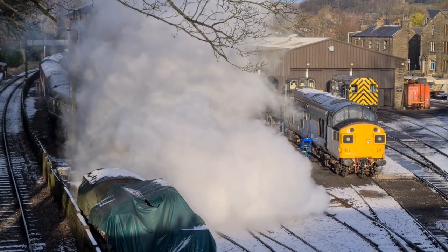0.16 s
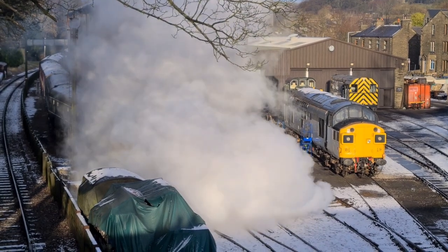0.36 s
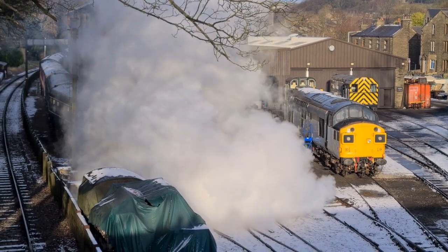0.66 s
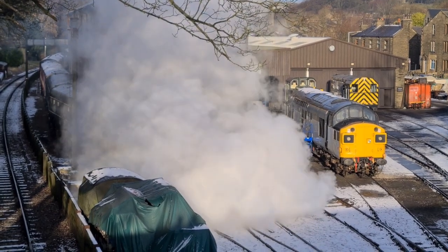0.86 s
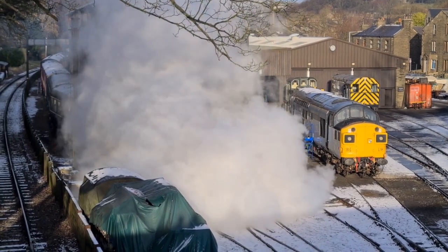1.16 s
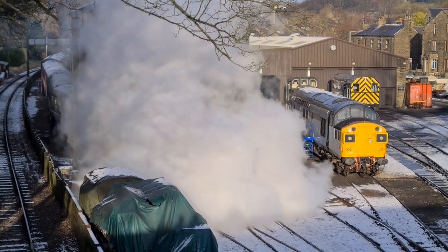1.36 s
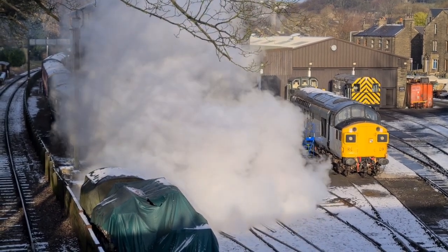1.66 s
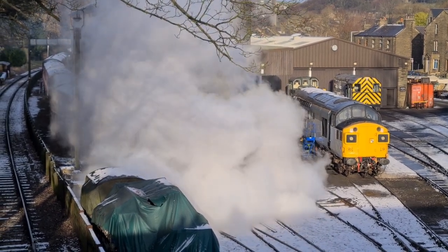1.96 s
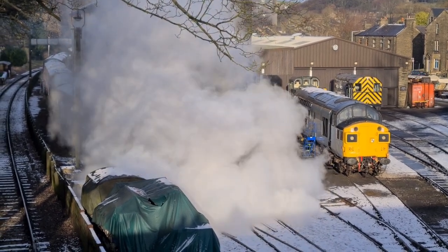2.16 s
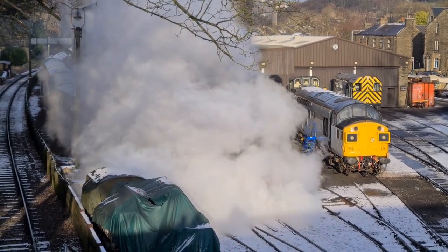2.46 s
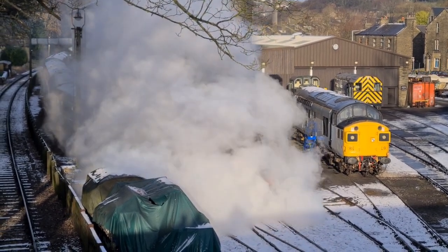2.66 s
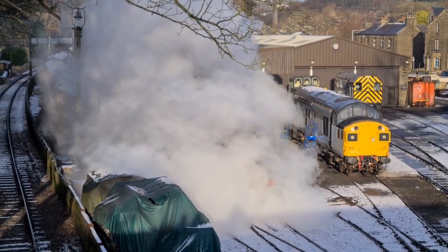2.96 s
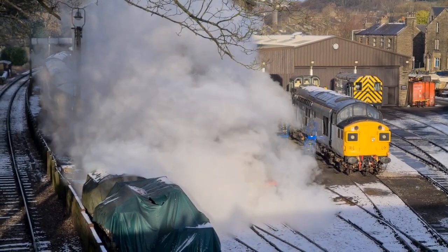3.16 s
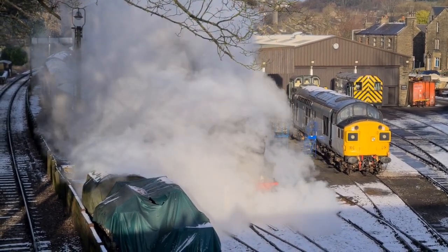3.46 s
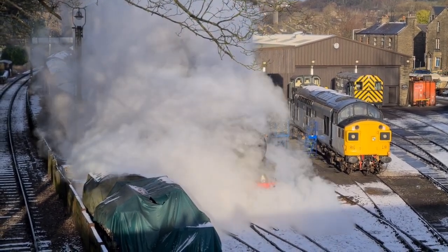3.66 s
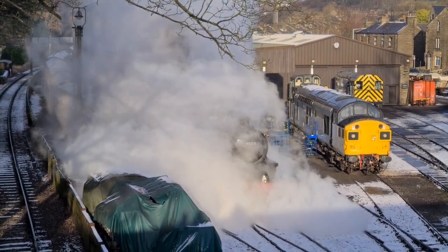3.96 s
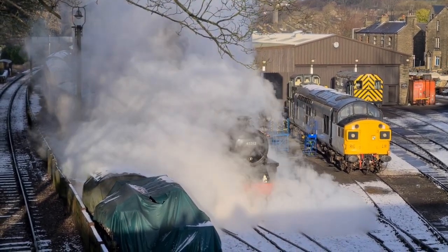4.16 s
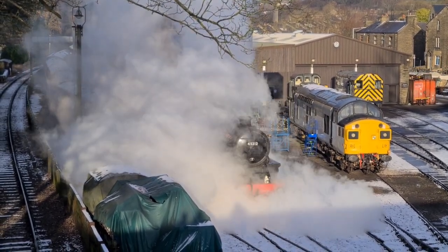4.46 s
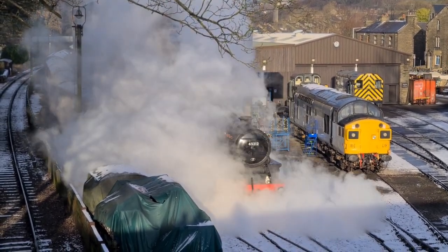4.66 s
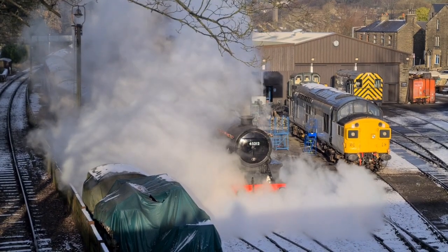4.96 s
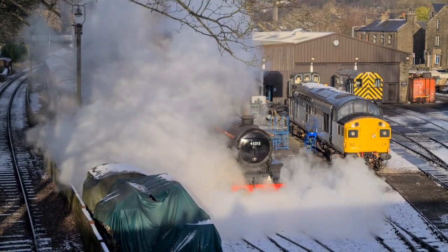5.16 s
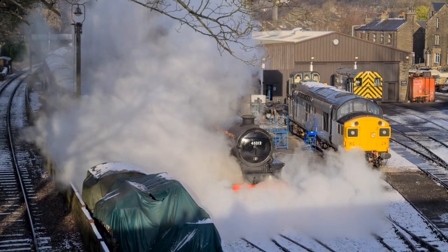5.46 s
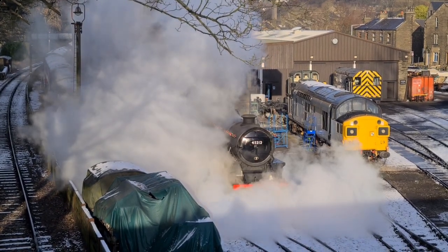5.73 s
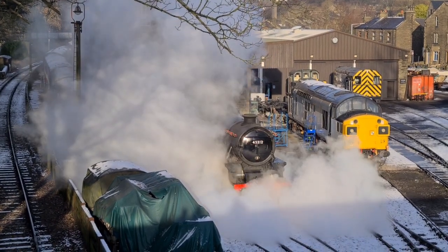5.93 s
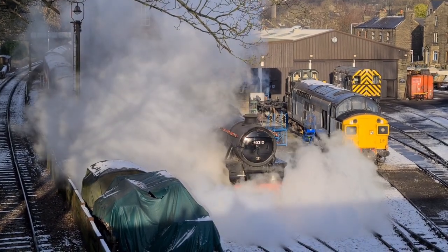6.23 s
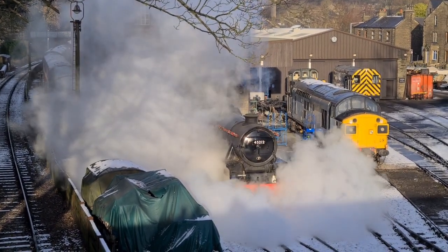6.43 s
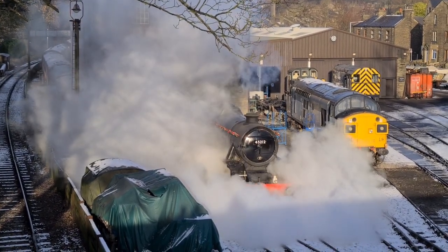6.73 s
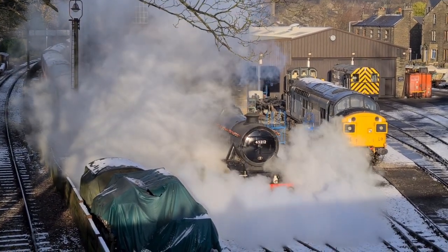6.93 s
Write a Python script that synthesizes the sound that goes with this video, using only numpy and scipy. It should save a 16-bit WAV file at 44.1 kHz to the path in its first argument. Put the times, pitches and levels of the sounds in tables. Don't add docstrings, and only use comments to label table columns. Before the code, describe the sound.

Dense roaring steam jets gush unevenly from a slow locomotive, dipping early then swelling strongly, over idling engines and gusts on the microphone.

```python
import sys
import numpy as np
from scipy import signal
from scipy.fft import rfft, irfft, next_fast_len
from scipy.io import wavfile

SR = 44100
rng = np.random.default_rng(int(sys.argv[2]) if len(sys.argv) > 2 else 0)


def nominal_scale(level):
    x = np.asarray(level, float) / 20
    return 10 ** x


def output_pcm(signal):
    pcm = np.clip(np.atleast_2d(signal).T, -1, 1) * 32767
    wavfile.write(sys.argv[1], SR, np.round(pcm).astype(np.int16))


N = 312669
SIZE = next_fast_len(N)
HZ = np.maximum(np.arange(SIZE // 2 + 1) * SR / SIZE, 1)
STEP = 100


def rms_one(x):
    return x / np.sqrt(np.mean(x ** 2) + 1e-20)


def centred(db):
    return db - np.mean(db)


def in_time(rows):
    s, *columns = np.transpose(rows)
    return [np.interp(np.arange(N) / SR, s, column) for column in columns]


def at_hz(points, hz):
    points = np.array(points, float)
    return np.interp(np.log(hz), np.log(np.maximum(points[:, 0], 1)), points[:, 1])


def swell(s, length_s, order):
    t = np.arange(0, N + STEP, STEP) / SR
    return np.exp(-np.abs(2 * (t - s) / length_s) ** order)


def fill(coarse):
    return np.interp(np.arange(N) / STEP, np.arange(len(coarse)), coarse)


def drift(rate_hz):
    hop, run_in = 40, 2000
    r = np.exp(-2 * np.pi * rate_hz * hop / SR)
    noise = rng.standard_normal(N // hop + run_in + 2)
    slow = signal.lfilter([1], [1, -2 * r, r * r], noise)[run_in:]
    return np.interp(np.arange(N) / hop, np.arange(len(slow)), rms_one(slow))


def bumps(modes):
    return nominal_scale(sum(db / (1 + (2 * (HZ - hz) / width) ** 2) for hz, width, db in modes))


def bands(straight, scattered, edges):
    for low, hz, high in zip(edges, edges[1:], edges[2:]):
        bell = np.interp(np.log(HZ), np.log([low, hz, high]), [0, 1, 0])
        yield hz, irfft(straight * bell, SIZE)[:, :N], irfft(scattered * bell, SIZE)[:, :N]


def echoes(x, level_db, count):
    t = np.arange(SIZE)
    lags = rng.uniform([.0008, -.0004], [.016, .0004], (count, 2))
    late = 0
    for lag, slide in lags:
        delay = np.abs(lag * SR + slide * t)
        late = late + x[np.rint(t - delay).astype(int)]
    return x + nominal_scale(level_db) * late


def field(colour, ports, echo_db):
    # pitch_hz, level_db
    tilt_points = [(60, -1.5), (130, -0.5), (290, -0.5), (640, -1), (1410, -2.5), (3100, 0), (6820, -4),
                   (15000, -2.5)]
    # pitch_hz, lead_radians
    lead_points = [(0, 0), (2650, -.3), (3050, -3.3), (3700, -4.6), (4150, -6.3), (4550, -6.6),
                   (4900, -7.8), (5050, -10.4), (5300, -12.6), (5750, -13.6), (6050, -16.6), (6500, -18.8),
                   (7300, -19.5), (16000, -44)]
    one, left, right = rng.standard_normal((3, SIZE))
    one = rms_one(echoes(one, echo_db, count=5))
    one, left, right = rfft([one, left, right]) * colour
    side = np.array([[1], [-1]])
    tilt = nominal_scale(side * at_hz(tilt_points, HZ) / 2)
    lead = np.exp(.5j * side * np.interp(HZ, *np.transpose(lead_points)))
    straight = one * ports * lead * tilt
    scattered = np.array([left, right]) * ports ** 0.52 * tilt
    return straight, scattered


def blend(hz, straight, scattered, share):
    # pitch_hz, likeness_0_to_1
    likeness = [(30, .42), (90, .55), (250, .91), (520, .88), (1200, .85), (2400, .99), (3150, .72),
                (4000, .88), (6500, .8), (8500, .58), (16000, .47)]
    alike = np.clip(at_hz(likeness, hz) * share, 0, 1)
    return np.sqrt(alike) * straight + np.sqrt(1 - alike) * scattered


def yard():
    # pitch_hz, level_db (per Hz)
    rumble = [(12, -39), (27, -9), (42, -1.5), (70, 1.5), (124, -4), (194, -1.5), (262, -2.5), (330, -5),
              (433, -10), (520, -11.5), (700, -12), (900, -23), (1400, -50)]
    # pitch_hz, width_hz, level_db
    idle = [
        (60, 14, 3),
        (84, 12, 3),
        (200, 18, 3),
        (230, 18, 3),
        (275, 25, 2),
    ]
    # time_s, level_db
    load = [
        (0.0, 0.5),
        (0.89, 3.5),
        (1.19, -2.3),
        (2.12, -5.0),
        (3.48, 6),
        (4.12, 3.5),
        (4.32, -4),
        (5.46, -2.5),
        (5.89, 1),
        (7.09, 3),
    ]
    # centre_s, length_s, level_db
    gusts = [
        (1.4, 0.17, 6),
        (1.906, 0.15, 3.5),
        (2.406, 0.46, 6),
        (2.722, 0.15, 5.5),
        (3.02, 0.072, 5.7),
        (3.768, 0.34, 7.5),
        (4.143, 0.22, 0.5),
        (5.596, 0.18, 9.9),
        (6.24, 0.14, 6.9),
        (6.672, 0.2, 8),
    ]
    throb_hz, drone_hz = 91, 202
    load_db, = in_time(load)
    gust_db = fill(sum(db * swell(s, length, order=2) for s, length, db in gusts))
    fade_db = 1.76 * np.arange(N) / SR
    throb_db = centred(0.66 * load_db + gust_db - fade_db)
    drone_db = centred(load_db + 0.24 * gust_db)
    straight, scattered = field(nominal_scale(at_hz(rumble, HZ)) * bumps(idle), 1.0, -14.0)
    out = 0
    for hz, near, far in bands(straight, scattered, np.geomspace(14, 1500, num=11)):
        high = at_hz([(throb_hz, 0), (drone_hz, 1)], hz)
        drone_share = at_hz([(350, 0.91), (650, 0.52)], hz)
        level_db = (1 - high) * throb_db + high * drone_db * drone_share
        lump_db = .7 * drift(4.7)
        out = out + nominal_scale(level_db + lump_db) * blend(hz, near, far, 0.93)
    return rms_one(out) * nominal_scale(-28.0)


def buffets():
    # time_s, peak_db, pitch_hz
    thumps = [
        (2.393, -18, 70),
        (3.76, -21, 80),
        (5.6, -23, 70),
        (3.02, -23, 75),
    ]
    t = np.arange(N) / SR
    out = 0
    for s, db, hz in thumps:
        hump = np.exp(-((t - s) * hz * 1.8) ** 2)
        out = out - nominal_scale(db) * hump * np.cos(2 * np.pi * hz * (t - s))
    return out


def jets():
    # pitch_hz, level_db (per Hz)
    jet = [(400, -66), (680, -15.5), (800, -6.5), (1120, -3), (1600, -2), (2200, -1), (2730, -4.5),
           (3100, -8), (4140, -8.5), (5900, -8), (7300, -15), (8000, -15.5), (9300, -22), (15800, -22.5)]
    # pitch_hz, width_hz, level_db
    left_port = [(2950, 300, -7), (4000, 700, 3), (4440, 160, -11), (4730, 180, 3), (5030, 200, -9),
                 (5450, 250, 3), (5750, 150, -4), (6300, 150, -3), (8400, 800, 3), (9300, 500, -3),
                 (14000, 1500, -3)]
    right_port = [(2000, 500, 3), (2950, 300, -3), (3580, 250, 5), (3880, 200, -5), (4440, 160, -7),
                  (4770, 200, 3), (5200, 220, -7), (6030, 450, 5), (6380, 160, -10), (6650, 250, 2),
                  (7250, 450, 5), (8400, 900, -5), (11900, 1200, 3), (14300, 1200, -4)]
    # time_s, straight_share_0_to_1, left_over_right_db
    path = [(0, 0.4, -1.5), (.4, 0.7, 0), (.65, 0.85, -0.5), (1.2, 0.84, -1.5), (1.65, 0.6, -0.5),
            (2.4, 0.5, -1), (2.7, 0.82, -1), (3.2, 0.58, -1), (4.3, 0.83, -1.5), (4.65, 0.86, 0),
            (5.2, 0.87, -2), (6.0, .76, 0), (6.6, 0.69, -2), (7.09, 0.57, 0)]
    # pitch_hz, gain_db
    clear_path = [(2500, 0.5), (4200, -0.5), (6800, -2), (9300, -2), (11500, -1), (14000, -2)]
    # time_s, flow_db, facing_db (how squarely the jets face the ports)
    flow = [(0.0, -6.0, 9), (0.28, -9.5, 7), (0.61, -3, 7.5), (1.0, -3.5, 7), (2.01, -9.5, -2.5),
            (2.38, -10.4, -2.5), (2.59, -5.0, -0.5), (2.67, -1.5, 0.1), (3.22, 3.5, 0.3), (3.52, -1.5, 0.2),
            (3.96, 5.5, 0.1), (4.24, -0.4, -2), (4.67, 9, -3.5), (4.88, 6.5, -5), (5.75, 6.5, -4.5),
            (5.89, 9.5, -3.5), (6.48, 5.5, -1.4), (7.09, 5.5, -1)]
    # pitch_hz, gain_db_per_db
    flow_share = [(1000, 0.7756), (2200, 1), (4200, 0.9638), (9500, 0.84)]
    facing_share = [(1000, 0.51), (2200, 0), (4200, 1), (5850, 1.32), (7200, 1.51), (8800, 1.12),
                    (10800, 1.5), (13300, 1.5)]
    # centre_s, length_s, level_db, pitch_hz
    spurts = [(0.076, 0.096, 6, 2100), (0.323, 0.28, 4.3, 990), (0.642, 0.074, 4.5, 8000),
              (0.748, 0.1, 5, 4300), (1.492, 0.16, 8.5, 10200), (1.633, 0.16, 7, 11400),
              (1.957, 0.12, 4.5, 5200), (3.603, 0.42, 5.5, 905), (3.771, 0.11, 2.5, 900),
              (4.103, 0.13, 2.5, 895), (4.324, 0.09, 4, 6100), (4.8, 0.072, 5.5, 12100),
              (5.098, 0.07, 4, 13500), (5.228, 0.16, 4.7, 8060), (5.389, 0.29, 3.5, 4760),
              (5.694, 0.24, 4, 1110)]
    # centre_s, length_s, level_db, pitch_hz
    more_spurts = [(0.934, .08, 2, 10000), (2.864, 0.06, 2, 9000), (3.22, 0.084, 2.5, 8000),
                   (3.82, 0.062, 2.5, 5500), (4.56, .1, 1, 9000), (4.66, .24, 1, 4170), (1.17, 0.1, 4, 8450),
                   (.42, 0.089, 1, 11000), (5.544, 0.073, 2, 4500), (5.91, .08, 2, 7000), (6.18, .15, 1, 2010),
                   (6.98, .1, 0.5, 2000)]
    # centre_s, length_s, level_db, pitch_hz
    veils = [
        (0.046, 0.27, -6, 3700),
        (0.061, 0.093, -2.9, 3400),
        (0.846, 0.091, -0.5, 900),
        (0.849, 0.1, -2, 10300),
        (1.073, 0.12, -3, 14300),
        (1.336, 0.18, -3.5, 12700),
        (4.704, 0.16, -3.2, 900),
        (5.074, 0.13, -2.4, 3430),
        (5.611, 0.13, -4, 2000),
    ]
    hiss_hz, sizzle_hz = 4200, 9500
    spread_octaves = 0.8
    surge_db, patch_db, flutter_db = .25, .8, 1.0

    share, pan_db = in_time(path)
    flow_db, facing_db = [centred(column) for column in in_time(flow)]
    nearing_db = 2 * (np.arange(N) - N / 2) / SR
    events = spurts + more_spurts + veils
    humps = np.array([db * swell(s, length, order=4) for s, length, db, _ in events])
    centres = np.array(events)[:, -1]
    surge = drift(12.0)
    ports = np.array([bumps(left_port), bumps(right_port)])
    straight, scattered = field(nominal_scale(at_hz(jet, HZ)), ports, -16.5)
    out = 0
    for hz, near, far in bands(straight, scattered, np.geomspace(330, 20000, num=21)):
        reach = np.exp(-(np.log2(hz / centres) / spread_octaves) ** 2)
        level_db = at_hz(flow_share, hz) * flow_db + at_hz(facing_share, hz) * facing_db
        level_db = level_db + at_hz([(hiss_hz, 0), (sizzle_hz, 1)], hz) * nearing_db
        level_db = level_db + fill(reach @ humps)
        level_db = level_db + at_hz(clear_path, hz) * centred(share)
        waver_db = surge_db * surge + patch_db * drift(3.0) + flutter_db * drift(30.0)
        waver_db = (hz / hiss_hz) ** .3 * waver_db
        out = out + nominal_scale(level_db + waver_db) * blend(hz, near, far, share * 1.15)
    out = out * nominal_scale(np.outer([.5, -.5], centred(pan_db)))
    return rms_one(out) * nominal_scale(-15.0)


def scene():
    return yard() + buffets() + jets()


def low_pass(x):
    return signal.sosfilt(signal.butter(12, 15740, fs=SR, output="sos"), x)


def record(dry):
    return low_pass(np.clip(dry, -.94, .94))


dry = scene()
out = record(dry)
output_pcm(out)
```